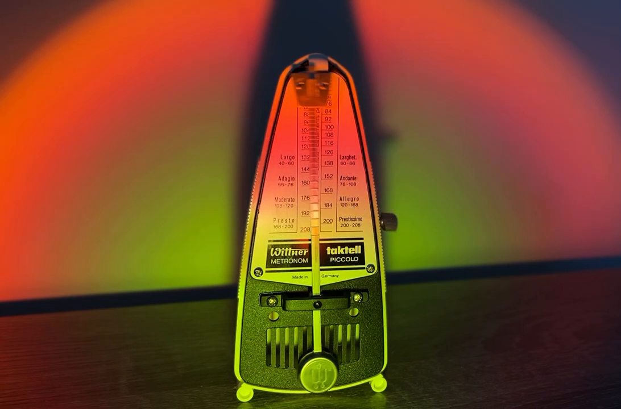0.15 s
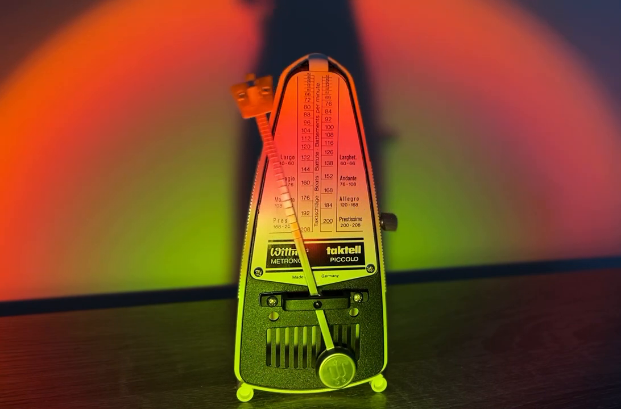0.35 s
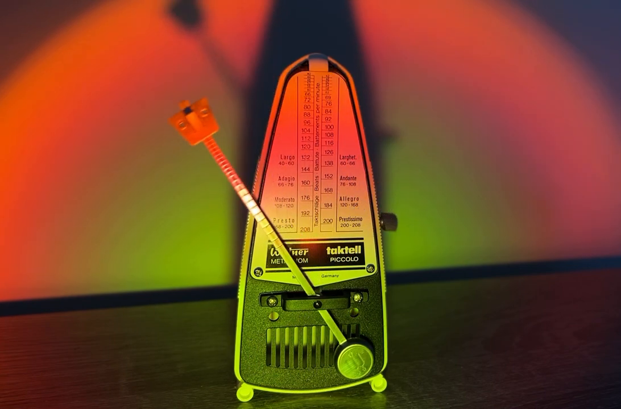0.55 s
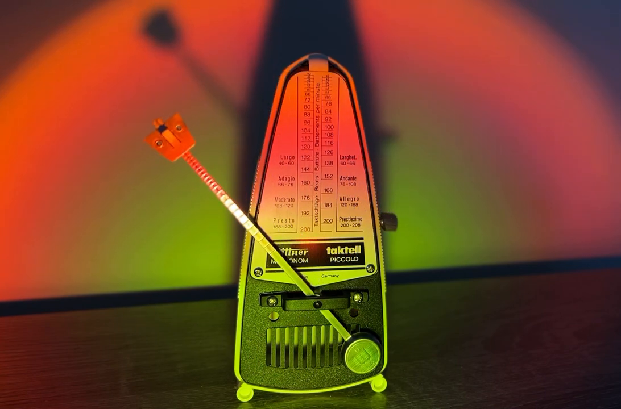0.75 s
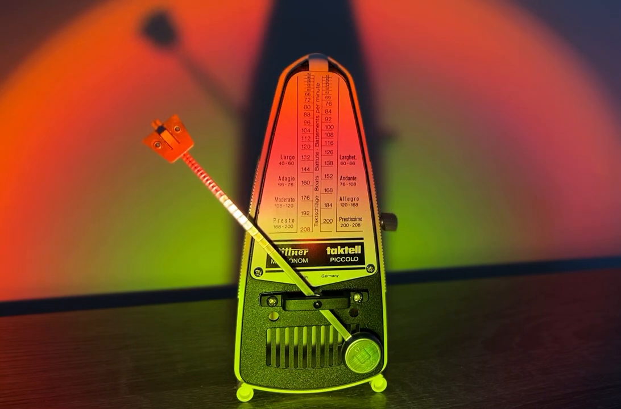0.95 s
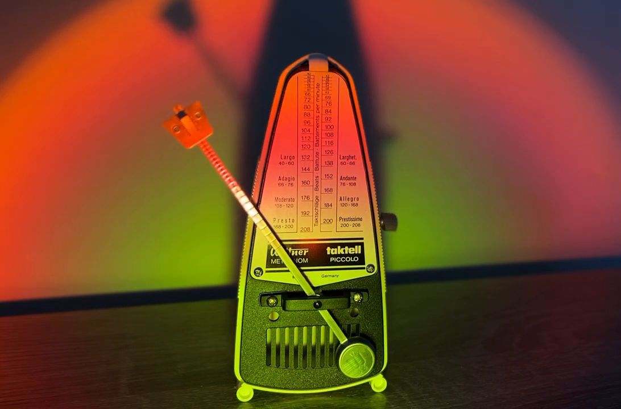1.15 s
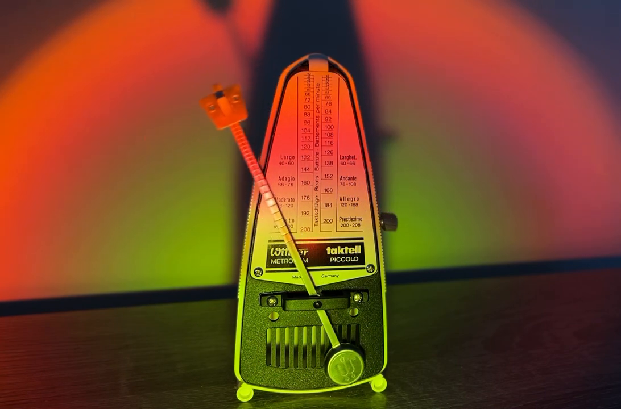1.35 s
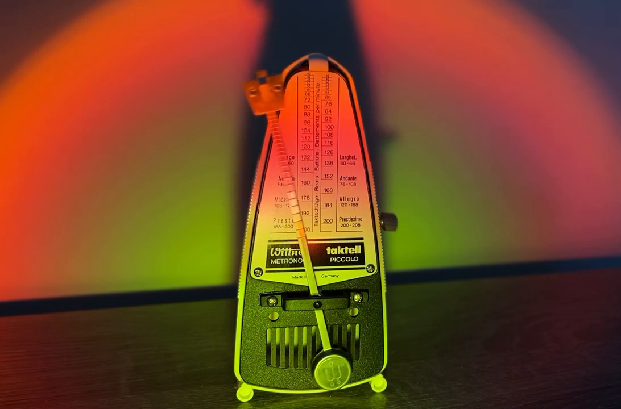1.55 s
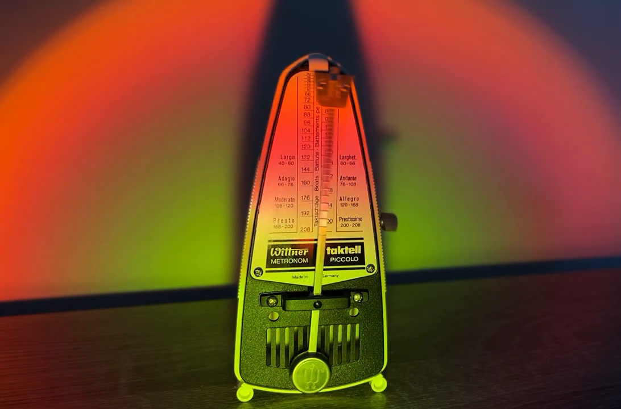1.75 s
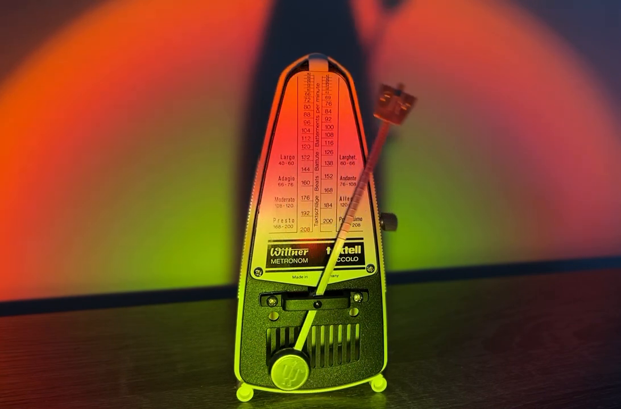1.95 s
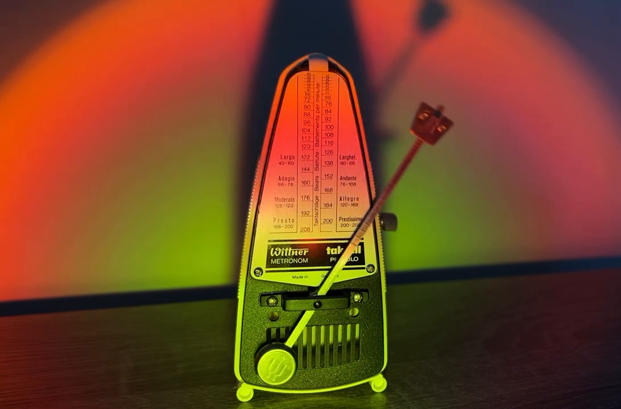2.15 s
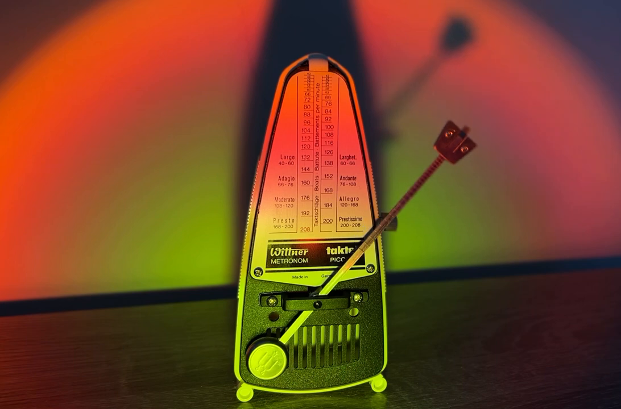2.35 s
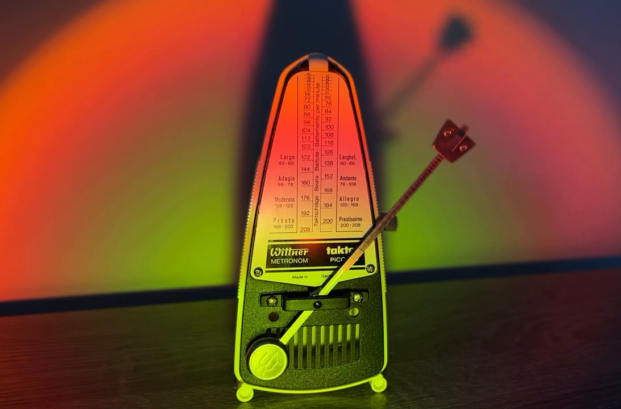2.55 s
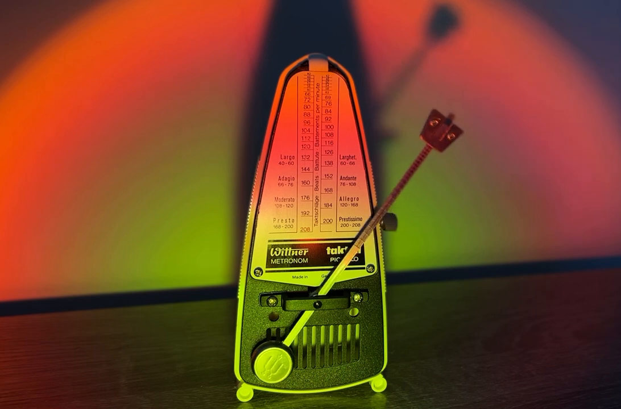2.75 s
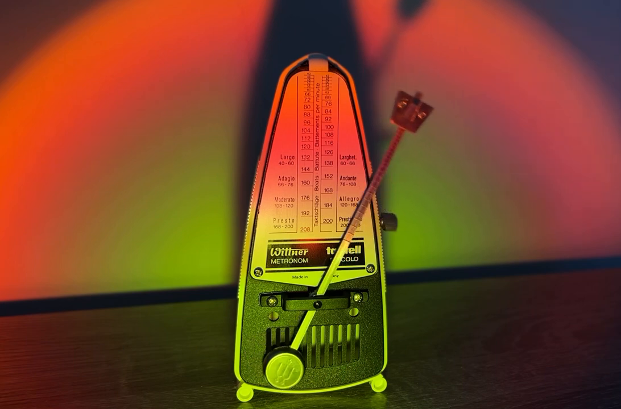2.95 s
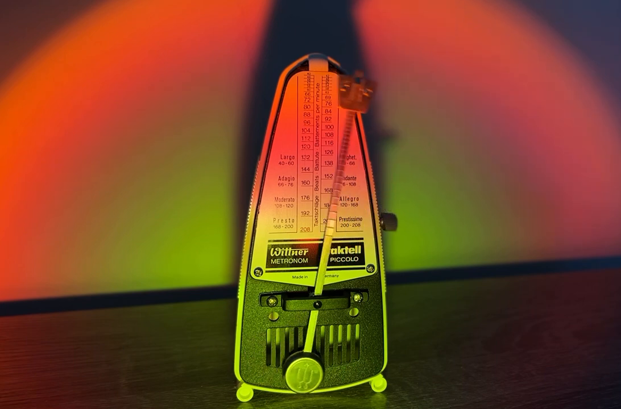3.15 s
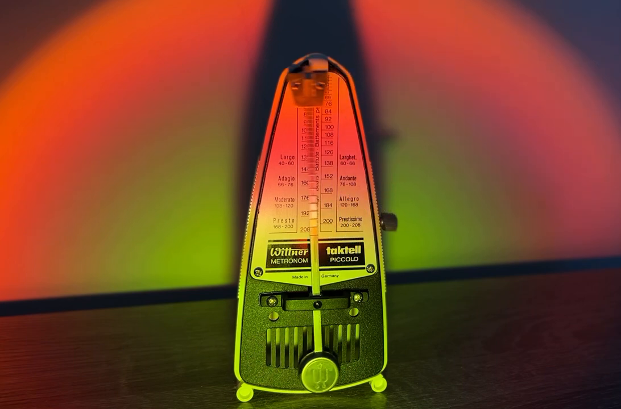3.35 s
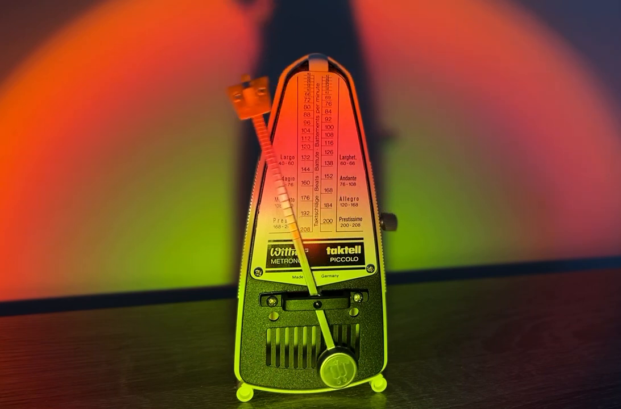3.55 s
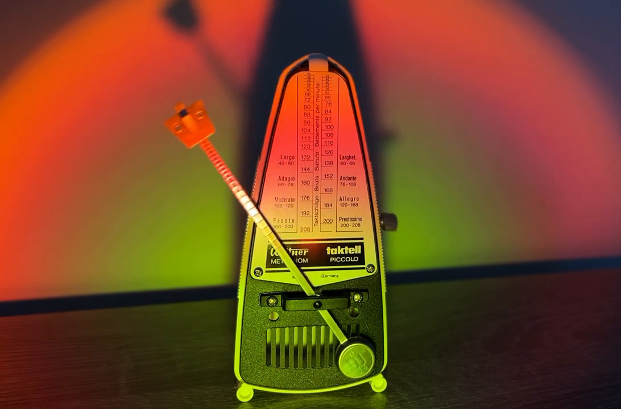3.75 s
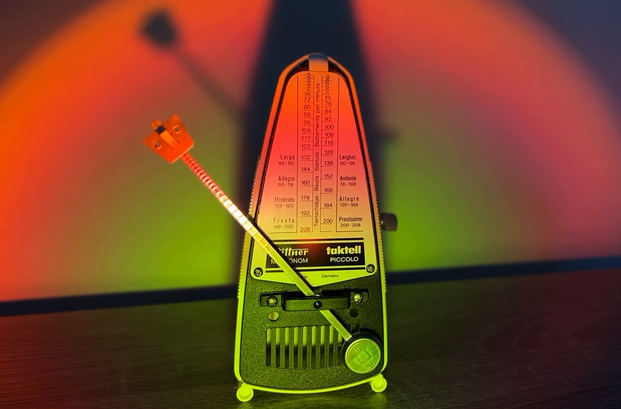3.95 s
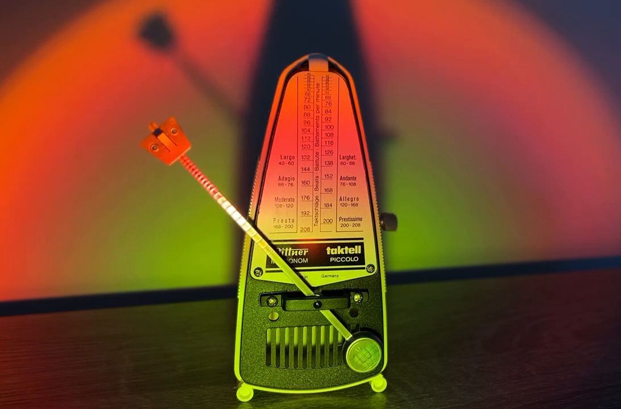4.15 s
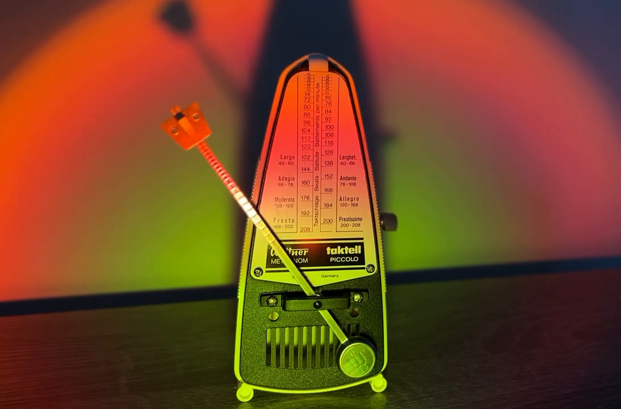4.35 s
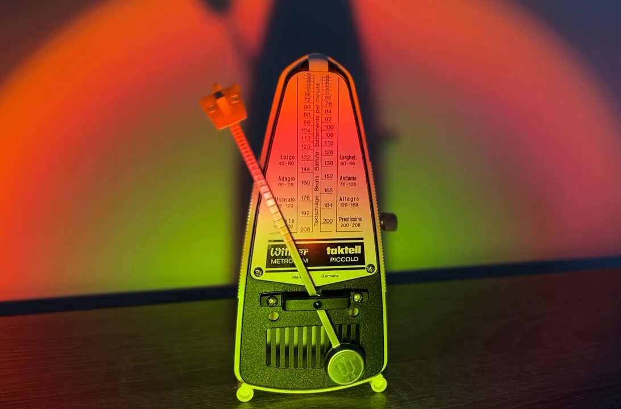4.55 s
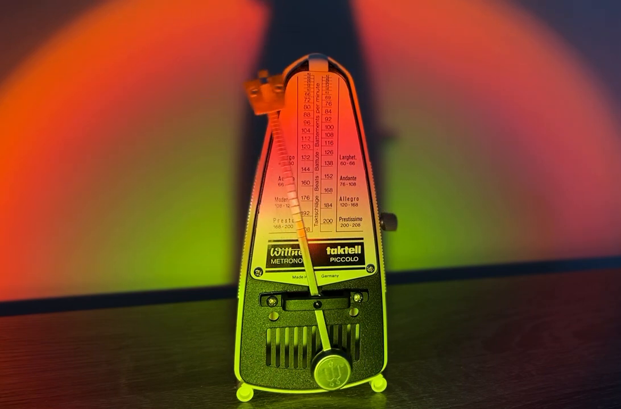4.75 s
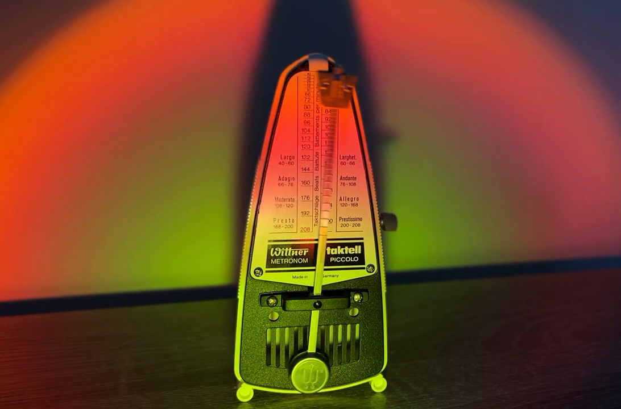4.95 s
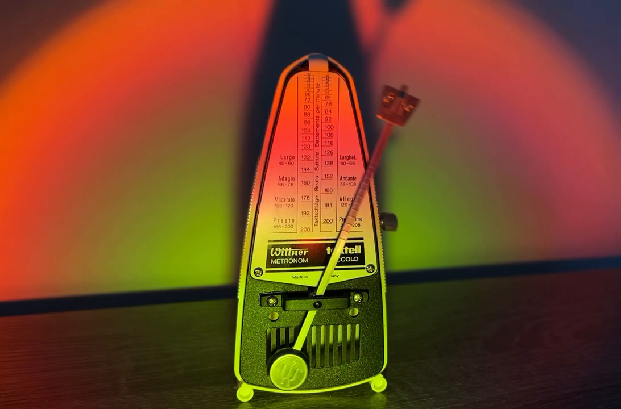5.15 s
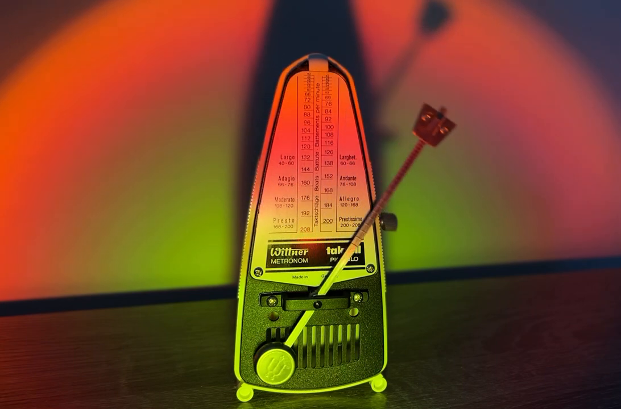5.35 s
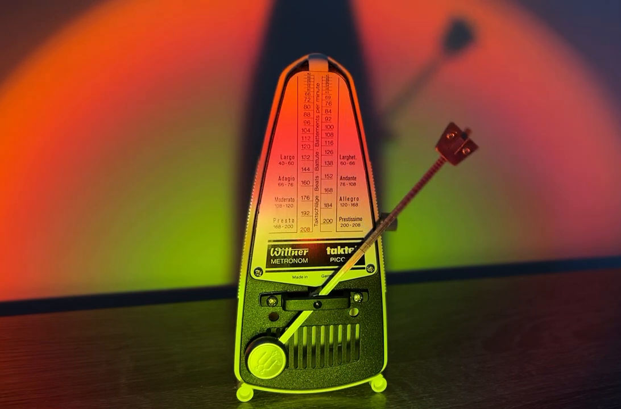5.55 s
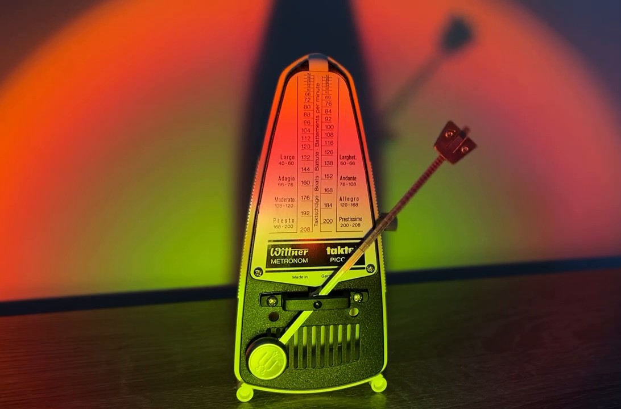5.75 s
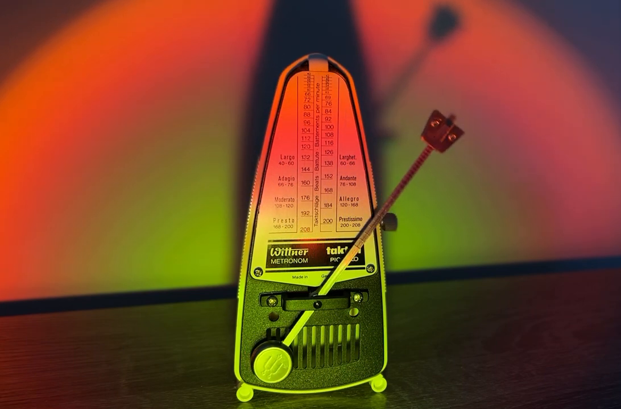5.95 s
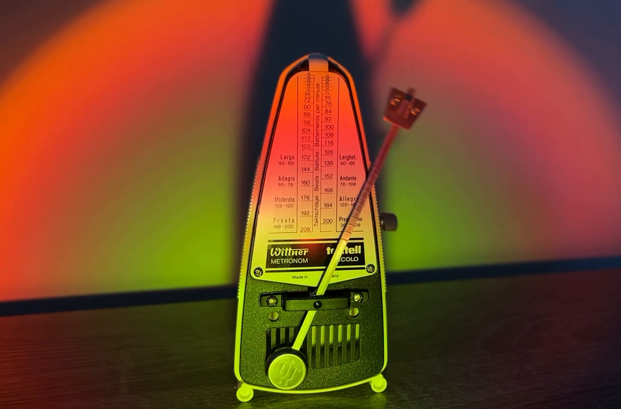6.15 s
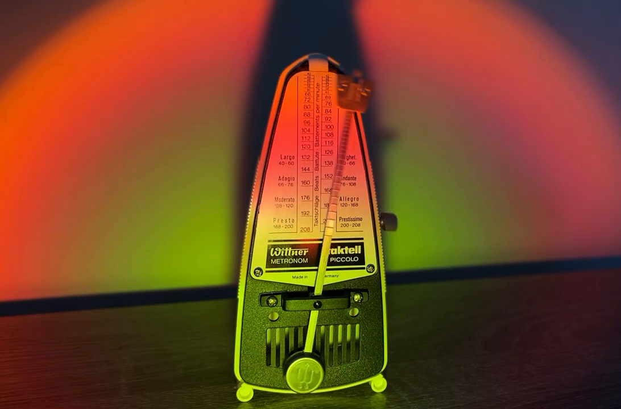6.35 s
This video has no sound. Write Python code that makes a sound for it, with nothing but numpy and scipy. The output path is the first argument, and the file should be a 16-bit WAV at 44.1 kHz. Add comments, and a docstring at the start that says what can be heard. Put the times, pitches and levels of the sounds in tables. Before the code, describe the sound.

A small clockwork metronome on a table in a quiet room, heard close up in stereo. Four slow beats, alternating tick and tock, each a sharp steel click with a hard plastic knock and a short ring through the table. A faint whirr, mostly on the left, swells for about a second after each beat, above low rumble and hiss.

```python
"""Slow metronome with a whirring motor

A clockwork metronome ticks on a table in a small, quiet room, to the left of a microphone with two ports.
At each of four beats filtered noise makes the steel click, and damped sines make the case knock, the table
top and the steel works ring. Fading noise makes the room's tail, a low shudder and a faint murmur.
Steady shaped noise makes the motor, louder for a second after each beat, and the low room rumble and hiss."""
import sys
import numpy as np
from scipy import signal
from scipy.fft import rfft, irfft
from scipy.io import wavfile

SR = 44100
rng = np.random.default_rng(int(sys.argv[2]) if len(sys.argv) > 2 else 0)


def wrap_up_sound(samples):
    """Save the sound to the file named by the first command line argument, as 16-bit audio."""
    columns = np.atleast_2d(samples).T
    # keep every value between -1 and 1, then stretch to whole-number steps
    tamed = np.clip(columns, -1, 1)
    steps = np.round(tamed * 32767).astype(np.int16)
    wavfile.write(sys.argv[1], SR, steps)


N = 282240  # length in samples


def gain_of(db):
    """Turns decibels into a factor."""
    return 10 ** (np.asarray(db) / 20)


def read(points, hz):
    """Reads every column of a table at the frequencies hz, with straight lines over log frequency."""
    table_hz, *columns = np.transpose(points)
    return [np.interp(np.log(hz + 1), np.log(table_hz + 1), column) for column in columns]


def ring(hz, t60, t):
    """A damped sine that starts at t = 0 and falls by 60 dB in t60 seconds."""
    t = np.maximum(t, 0)
    return gain_of(-60 * t / t60) * np.sin(2 * np.pi * hz * t)


def white(channels):
    """Spectra of white noise at 0 dB per Hz."""
    return rfft(rng.standard_normal((channels, N))) * np.sqrt(SR / 2)


def add(mix, start_s, sound):
    """Mixes a sound in at start_s seconds, cut off where the mix ends."""
    part = mix[:, round(start_s * SR):][:, :sound.shape[1]]
    part += sound[:, :part.shape[1]]


# Tone color of the motor. Each row: pitch in Hz, relative left level in dB per Hz,
# right level minus left in dB, lead of the left port in radians.
WHIRR = [(506, -122, -1, -1.5), (792, -114, -3, -2.15), (1040, -96.5, -8, -1.47), (1140, -99, -11, -1.87),
         (1390, -98.5, -19, -2.6), (1485, -97.5, -22.5, -2.5), (1692, -87.5, -16, -4.5),
         (2288, -99, -16.5, -3.5), (2410, -107, -15, -6), (2610, -115, -26.5, -7), (3120, -114, -26, -4),
         (3900, -108, -25, 0), (4050, -113, -27.5, -5), (4600, -108, -26, 0), (5640, -118, -25, -7),
         (5900, -114, -20.5, -1.5), (7500, -119, -15, 1.5), (8300, -122, -10, 2.5), (9000, -140, -3, 2.5)]
# How much louder the motor is after a beat. Each row: pitch in Hz, boost in dB.
SWELL = [(700, 2.), (1000, 4.5), (1700, 2.5), (2500, 0.5), (3500, 0.86)]
# A steady thin tone. One row: pitch in Hz, left level in dB, right level in dB.
WHINE = (8301, -96, -112)
WHIRR_DB = -69.5  # level of the two ports' average at rest
SWELL_S, DROP_S = 1, 0.02  # seconds the whirr stays louder, seconds it takes to drop


def whirr():
    """One noisy motor reaches both ports, mostly far louder at the left, and swells after each beat."""
    hz, t = np.fft.rfftfreq(N, 1 / SR), np.arange(N) / SR
    left_db, right_db, lead = read(WHIRR, hz)
    left = gain_of(left_db)
    right = gain_of(left_db + right_db) * np.exp(-1j * lead)
    spectrum = white(channels=1) * np.array([left, right])
    rest = irfft(spectrum, N)
    loud = irfft(spectrum * gain_of(read(SWELL, hz)), N)
    held = sum((t > s) * np.clip((s + SWELL_S - t) / DROP_S, 0, 1) for s in BEAT_S)
    motor = rest + held * (loud - rest)
    sine = np.sqrt(2) * np.sin(2 * np.pi * WHINE[0] * t)
    whine = gain_of(WHINE[1:])[:, None] * sine
    return gain_of(WHIRR_DB) * motor / rest.mean(0).std() + whine


# Noise of the room and the electronics. Each row: pitch in Hz, level in dB per Hz,
# share of the power that both ports have in common, from 0 to 1.
RUMBLE = [(25, -125, 0.94), (45.4, -94.5, .95), (93, -101, 0.99), (212, -108, 0.38), (290, -111, 0.25),
          (430, -106, 1), (540, -113, 0.26), (760, -120, .35), (1030, -119, 0.43), (2500, -122, .1),
          (5025, -129, 0.11), (9000, -131, 0.49), (9130, -121, .9), (9220, -132, .3), (10600, -135, 0.18),
          (12400, -130, 0.88), (14000, -128, 1), (14500, -130, .9), (14800, -141, .6), (15400, -148, 0.56)]


def rumble():
    """Low room noise and circuit hiss are partly shared between the ports."""
    db, same = read(RUMBLE, np.fft.rfftfreq(N, 1 / SR))
    same = np.clip(same, 0, 1)
    shared, left, right = white(channels=3)
    both = np.sqrt(same) * shared + np.sqrt(1 - same) * np.array([left, right])
    return irfft(gain_of(db) * both, N)


# Tone color of the steel click. Each row: pitch in Hz, relative left level in dB, relative right level in dB.
CLICK = [(200, -80, -80), (1200, -41, -46.5), (2340, -26.5, -33), (3340, -26, -33), (4613, -26.5, -38),
         (5500, -29, -37.5), (6860, -33.5, -34.5), (8800, -26, -28), (9250, -37, -36), (10000, -53, -57.5),
         (12408, -34.5, -36.5), (14300, -32, -30), (15500, -36, -39), (16200, -48.5, -54.5)]
CLICK_LEAD_S = .000143  # the click reaches the right port this many seconds first


def click():
    """Steel on steel makes a dense rattle that dies within a few hundredths of a second."""
    t, hz = np.arange(4096) / SR, np.fft.rfftfreq(4096, 1 / SR)
    shared, own = rng.standard_normal((2, 4096))
    noise = rfft(np.array([shared, .92 * shared + .4 * own]))
    noise = noise * np.exp(2j * np.pi * hz * np.array([[0], [CLICK_LEAD_S]]))
    rattle = irfft(noise * gain_of(read(CLICK, hz)))
    rise = np.minimum(t / .002, 1) ** 2
    return rattle * rise * gain_of(9.5 - 60 * t / 0.031)


# Ways the case vibrates; tick and tock strike different pallets, and the sign gives the first motion.
# Each row: pitch in Hz, time to fall 60 dB in seconds, relative swing left and right on the tick,
# relative swing left and right on the tock.
CASE = [(628, 0.05, -0.05, -0.13, 0.015, -0.06), (780, 0.016, -0.605, -0.008, -0.319, -0.082),
        (879, 0.016, 0.572, 0.398, -0.088, 0.276), (941, 0.022, 0.361, -0.11, 0.826, -0.006),
        (1041, 0.045, -0.059, 0.026, -0.13, 0.037), (1205, 0.015, -0.013, 0.109, -0.021, 0.094),
        (1611, 0.022, -0.231, -0.114, -0.236, -0.11), (1792, 0.025, -0.012, -0.054, -0.011, -0.063),
        (2094, 0.012, -0.108, -0.068, -0.094, -0.048), (2246, 0.012, 0.021, 0.067, 0.001, 0.065),
        (2835, 0.012, -0.114, -0.099, -0.036, -0.113), (2959, 0.015, -0.134, 0.17, -0.254, 0.17),
        (3191, 0.041, -0.014, 0.033, -0.017, 0.034), (3615, 0.02, 0.137, -0.035, 0.038, -0.003),
        (3705, 0.017, -0.254, 0.079, -0.123, 0.048), (3835, 0.047, -0.043, 0.018, -0.05, 0.014),
        (4129, 0.028, 0.223, -0.013, 0.169, -0.017), (4852, 0.045, -0.016, 0.002, -0.011, 0.003),
        (5270, 0.013, 0.04, -0.004, 0.065, 0.001), (5431, 0.065, 0.02, 0.005, 0.015, 0.006)]
KNOCK_HZ = 2450  # below this pitch the walls of the case answer later
KNOCK_S = np.array([[.00049], [.00057]])  # that delay in seconds, left and right


def case(pallet):
    """The plastic case rings in its modes, and each blow lands a little differently."""
    t, out = np.arange(4096) / SR, np.zeros((2, 4096))
    spread = rng.standard_normal((len(CASE), 2)) * [.7, .002]  # dB, share of the pitch
    for (hz, t60, *swing), (db, detune) in zip(CASE, spread):
        late = KNOCK_S * (hz < KNOCK_HZ)
        both_ports = np.reshape(swing, (2, 2, 1))[pallet]
        out += gain_of(db) * both_ports * ring(hz * (1 + detune), t60, t - late)
    no_bass = signal.butter(3, 330, "high", fs=SR, output="sos")  # a small box sends out no bass
    return signal.sosfilt(no_bass, out)


# What the room gives back of a blow, mixed from all sides of the case. Each row: pitch in Hz,
# time to fall 60 dB in seconds, left and right starting level in dB per Hz, for a blow of 0 dB.
ROOM = [(60, .2, -110, -110), (174, 0.49, -79, -77.5), (450, 0.3, -76.5, -76.5), (633, 0.27, -73, -73),
        (875, .27, -57.5, -56), (1241.2, 0.17, -69.5, -70), (1600, 0.2, -62, -64.5),
        (2300, 0.2, -73.5, -74.5), (2830, 0.16, -72, -76), (2854, .26, -64.5, -65.5),
        (3398, 0.23, -70.5, -73.5), (3800, 0.27, -66, -69.5), (4150, 0.2, -63.5, -68),
        (4370, 0.27, -72, -77.5), (4740, 0.25, -72.5, -79), (8940, 0.18, -81, -80),
        (9500, 0.11, -100, -100), (11000, 0.11, -102, -102), (11500, .22, -89.5, -90),
        (14900, .2, -92, -92), (15500, .1, -108, -108)]


def room(habit):
    """A dense tail dies band by band, partly alike at both ports and from blow to blow."""
    shared, left, right = .7 * habit + .7 * rng.standard_normal(habit.shape)
    both = .7 * shared + .7 * np.array([left, right])
    hz, t, bands = signal.stft(both, SR, nperseg=512)
    t60, *db = (column[:, None] for column in read(ROOM, hz))
    fading = bands * np.sqrt(SR / 2) * gain_of(db - 60 * t / t60)
    tail = signal.istft(fading, SR, nperseg=512)[1]
    rise = np.clip(np.arange(tail.shape[1]) / SR / 0.004, 0, 1)
    return tail * rise


# Ringing of the steel frame and rod. Each row: pitch in Hz, time to fall 60 dB in seconds, relative level in dB.
FRAME = [(783, .19, -40), (1250, .22, -47), (1647, .26, -44), (2982, 0.25, -52), (3690, 0.18, -46),
         (4100, .22, -46), (5370, 0.14, -50)]
FLUTTER_DB = 5.  # typical size of the flutter: the rings come back from the walls unevenly


def works():
    """The steel frame and rod ring on, each mode fluttering and a little different from blow to blow."""
    t = np.arange(SR // 2) / SR
    spread = rng.standard_normal((len(FRAME), 2)) * [2, .002]  # dB, share of the pitch
    flutter = rng.standard_normal((len(FRAME), 2, 26))  # one value every 20 ms at each port
    out = np.zeros((2, len(t)))
    for (hz, t60, db), (more_db, detune), sides in zip(FRAME, spread, flutter):
        wobble = np.array([np.interp(t, np.arange(26) / 50, side) for side in sides])
        level = gain_of(db + more_db + FLUTTER_DB * wobble)
        out += level * ring(hz * (1 + detune), t60, t)
    rise = np.minimum(t / 0.012, 1)
    return out * rise * [[1.2], [.8]]  # left and right


# Murmur after the tick, then after the tock. Each row: starting level at the left in dB,
# time to fall 60 dB in seconds.
MURMUR = [(-79., 5.), (-82., 2.9)]
MURMUR_HZ, MURMUR_WIDTH_HZ = 710, 220  # middle and width of the band


def murmur(db, t60):
    """A narrow band of noise fades slowly and is gone when the whirr drops."""
    t = np.arange(round(SWELL_S * SR)) / SR
    edges = [MURMUR_HZ - MURMUR_WIDTH_HZ / 2, MURMUR_HZ + MURMUR_WIDTH_HZ / 2]
    band = signal.butter(2, edges, "band", fs=SR, output="sos")
    shared, own = signal.sosfilt(band, rng.standard_normal((2, len(t))))
    both = np.array([shared, .6 * shared + 0.48 * own]) / shared.std()
    drop = np.clip((SWELL_S - t) / DROP_S, 0, 1)
    return both * gain_of(db - 60 * t / t60) * drop


# Tone color of the shudder. Each row: pitch in Hz, relative level in dB per Hz.
THUD = [(30, -110), (50, -81.5), (90, -82.5), (160, -90), (300, -102), (700, -106), (1000, -120)]


def shake(start_s, db):
    """A low shudder swells after the blow and fades over about a second."""
    t = np.maximum(np.arange(N) / SR - start_s, 0)
    color = gain_of(read(THUD, np.fft.rfftfreq(N, 1 / SR)))
    noise = irfft(white(channels=1) * color, N)
    swell = 1 - np.exp(-t / .03)
    return noise * swell * gain_of(db - 6 - 60 * t / 1.3)


# Ringing of the table top. Each row: pitch in Hz, time to fall 60 dB in seconds, relative level in dB.
TABLE = [(287, .52, -43), (236, 0.44, -54), (378, 0.25, -57), (175.5, 0.26, -54)]
TABLE_LATE_S = 0.0048  # the table answers this many seconds after the blow
TABLE_DAMP_S = .27  # around this time in seconds the faint ring starts to die faster


def table(t):
    """The table top is pushed through the feet and swells for a moment before it dies."""
    swell = (1 - np.exp(-t / .012)) * [[1.1], [.9]]  # left and right
    rings = sum(gain_of(db) * ring(hz, t60, t) for hz, t60, db in TABLE)
    return rings * swell * np.exp(-(t / TABLE_DAMP_S) ** 4)


# Reflections from walls and table edge. Each row: delay in seconds, relative level in dB.
ECHOES = [(.008, -25), (0.023, -15.5), (0.032, -23.5), (0.039, -26.5)]


def echoes(sound):
    """Walls and table edge send back a few dull single reflections, with both ports mixed."""
    taps = np.zeros(SR // 20)
    for delay_s, db in ECHOES:
        taps[round(delay_s * SR)] = gain_of(db)
    dull = signal.lfilter(*signal.butter(2, 1800, fs=SR), taps)
    mixed = 0.22 * sound + 0.19 * sound[::-1]
    return signal.fftconvolve(mixed, dull[None], axes=1)[:, :N]


# The moments when a tooth lands on the escapement, in seconds.
BEAT_S = [.37979, 1.85979, 3.55893, 5.04999]
# How strong each beat is. Each row: blow strength in dB, then the relative levels of click,
# table ring and shudder in dB.
BEATS = [(1, 2, 1.5, -1.5), (.5, 5.5, -4, -1), (0.5, 1.5, 0, -8.5), (0, 3.5, -5, 0.5)]


def scene():
    """Four beats, tick and tock in turn, sound in the room over the motor and the steady noises."""
    ticks, tails = np.zeros((2, 2, N))
    habit = rng.standard_normal((3, SR // 2))  # the same walls answer every blow
    for k, (start_s, levels) in enumerate(zip(BEAT_S, BEATS)):
        db, click_db, table_db, shudder_db = levels
        pallet = k % 2  # 0 is the tick, 1 the tock
        add(ticks, start_s, gain_of(db) * case(pallet))
        add(ticks, start_s - .0014, gain_of(click_db) * click())
        add(tails, start_s, gain_of(db) * room(habit))
        add(tails, start_s, gain_of(db) * works())
        add(tails, start_s, murmur(*MURMUR[pallet]))
        add(tails, start_s + TABLE_LATE_S, gain_of(table_db) * table(np.arange(SR) / SR))
        tails += shake(start_s, shudder_db)
    return ticks + echoes(ticks) + tails + whirr() + rumble()


def record(dry):
    """A steep low-pass filter removes what lies above about 16 kHz."""
    low_pass = signal.firwin(511, 16300, window=("kaiser", 12), fs=SR)
    return signal.oaconvolve(dry, low_pass[None], "same")


dry = scene()
out = record(dry)
wrap_up_sound(out)
```